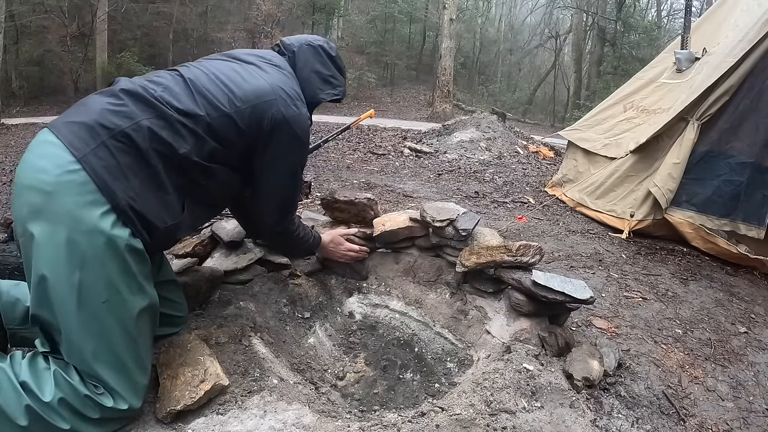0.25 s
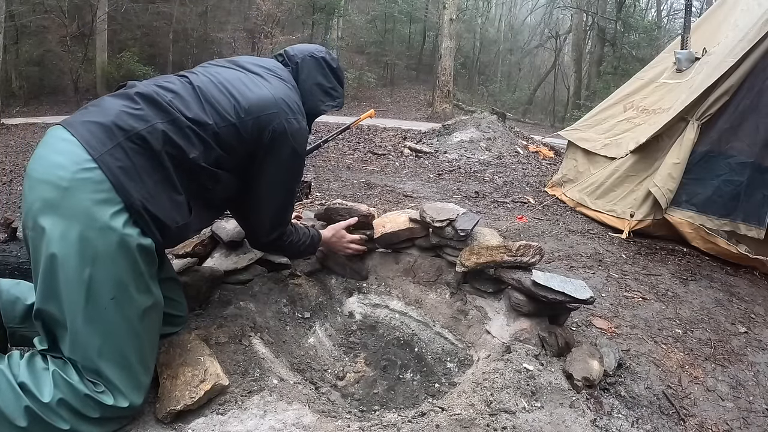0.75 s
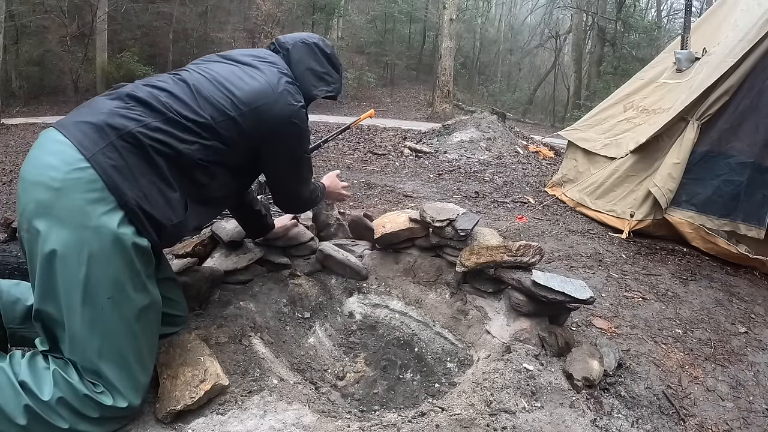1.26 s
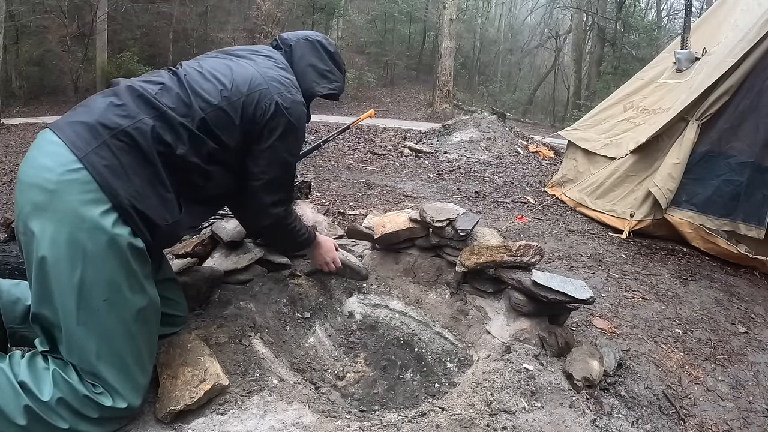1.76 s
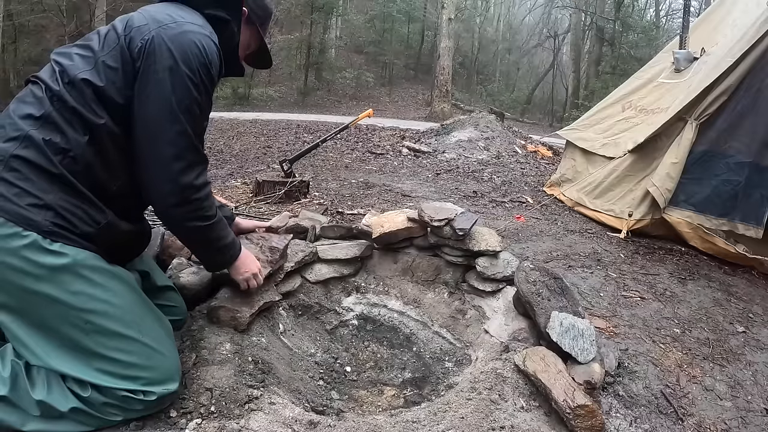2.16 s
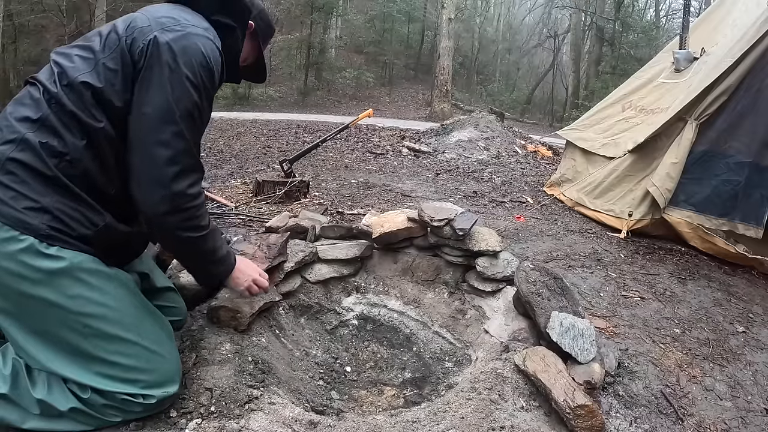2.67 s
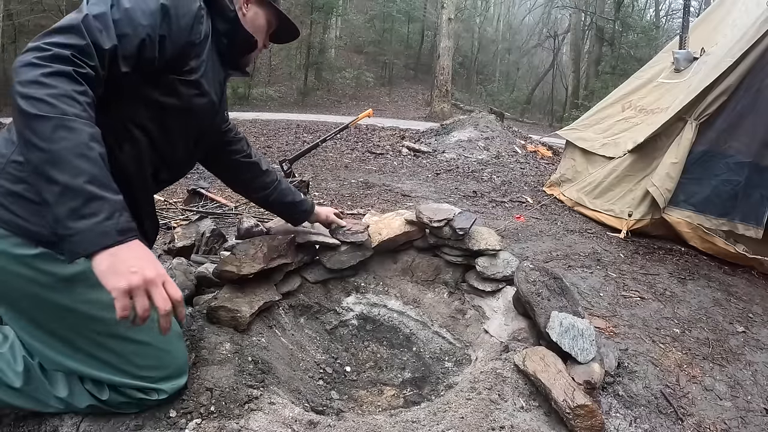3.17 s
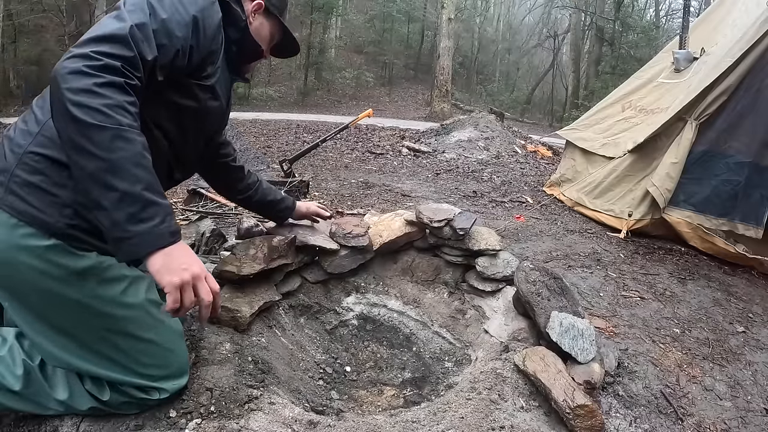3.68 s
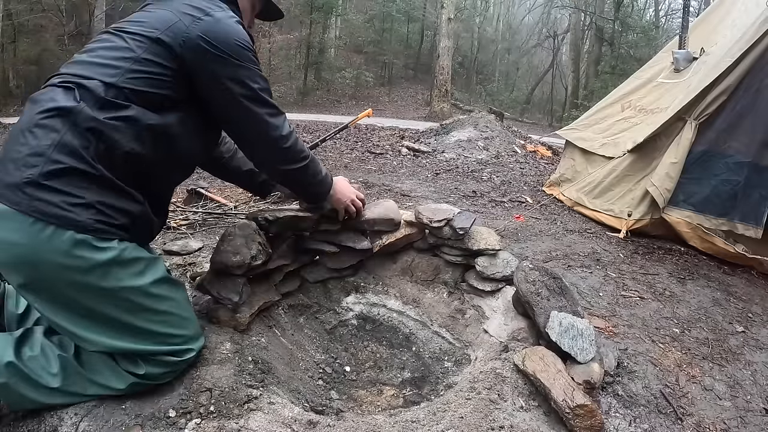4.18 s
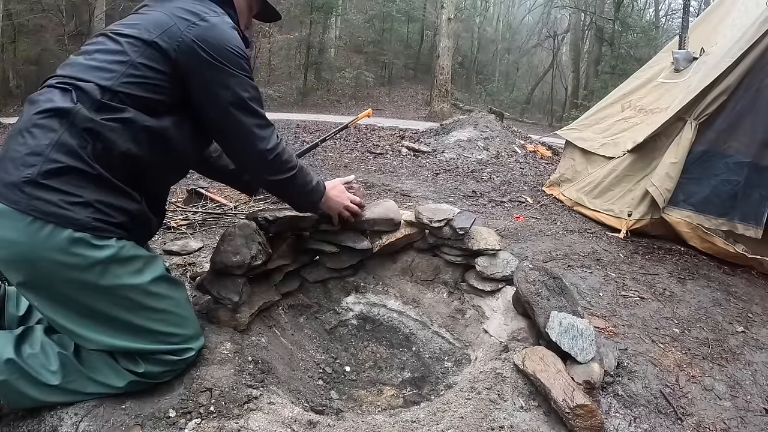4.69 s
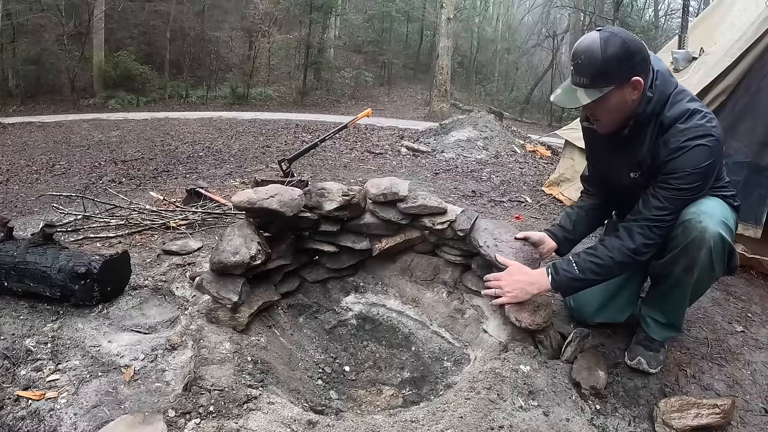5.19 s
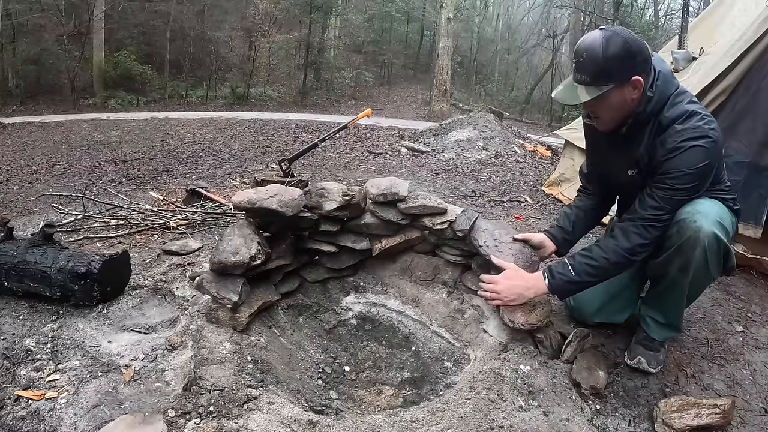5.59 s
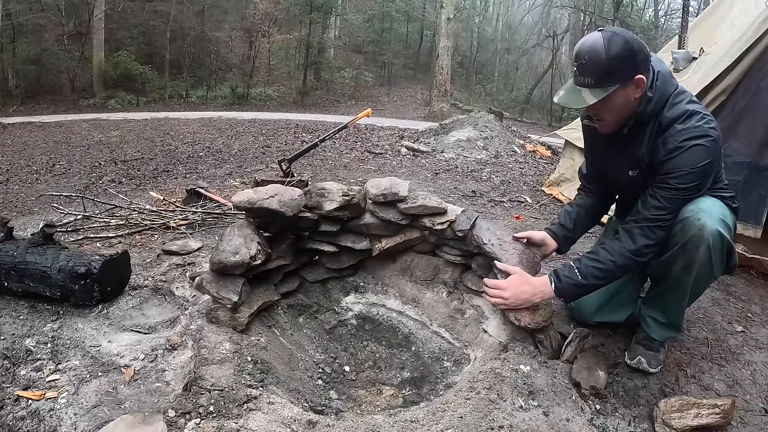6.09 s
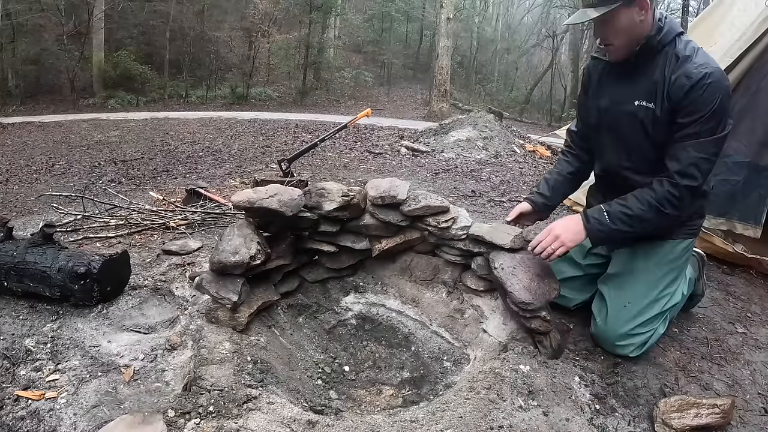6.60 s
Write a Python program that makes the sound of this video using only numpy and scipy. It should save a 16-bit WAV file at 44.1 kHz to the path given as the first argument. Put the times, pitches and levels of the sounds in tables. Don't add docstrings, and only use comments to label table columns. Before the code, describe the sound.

Close, hard stone knocks and gritty dragging come in bursts, then thin out to soft settling ticks over a faint wet woodland hush.

```python
import sys
import numpy as np
from scipy import signal
from scipy.fft import rfft, irfft
from scipy.io import wavfile
from scipy.ndimage import uniform_filter1d

SR = 44100
rng = np.random.default_rng(int(sys.argv[2]) if len(sys.argv) > 2 else 0)


def transcribe(signal):
    frames = np.atleast_2d(signal).T
    limited = np.clip(frames, -1, 1)
    pcm = np.round(limited * 32767).astype(np.int16)
    wavfile.write(sys.argv[1], SR, pcm)


def volts_from_decibels(level):
    exponent = np.asarray(level, float) / 20
    return 10 ** exponent


N = 302016


def evened(x):
    return x / np.sqrt(np.mean(x ** 2) + 1e-20)


def read(points, hz):
    f, value = np.transpose(points)
    return np.interp(np.log(hz + 1), np.log(f + 1), value)


def coloured(x, points):
    gain = volts_from_decibels(read(points, np.fft.rfftfreq(N, 1 / SR)))
    return evened(irfft(rfft(x) * gain, N))


def band(x, low_hz, high_hz):
    return signal.lfilter(*signal.butter(2, [low_hz, high_hz], "band", fs=SR), x)


def resonated(x, hz, width_hz):
    return evened(signal.lfilter(*signal.iirpeak(hz, hz / width_hz, SR), x))


def add(mix, start_s, sound):
    part = mix[..., round(start_s * SR):][..., :sound.shape[-1]]
    part += sound[..., :part.shape[-1]]


def placed(x, pan_db):
    return np.array([x * volts_from_decibels(pan_db / 2), x * volts_from_decibels(-pan_db / 2)])


def ring(hz, t60_ms, rise_ms, phase, size=5292):
    ms = np.arange(size) * 1000 / SR
    rise = (1 - np.exp(-ms / rise_ms)) ** 2
    return volts_from_decibels(-60 * ms / t60_ms) * rise * np.sin(2 * np.pi * (hz * ms / 1000 + phase))


def grains(per_s, spread_db):
    draw = rng.random((N, 3))
    size = volts_from_decibels(spread_db * np.minimum(-np.log(1 - draw[:, 0]), 4))
    return size * np.sign(draw[:, 1] - .5) * (draw[:, 2] < per_s / SR)


def echoes(length_s, t60_s):
    t = np.arange(round(length_s * SR)) / SR
    arrivals = rng.standard_normal((2, len(t))) * (rng.random((2, len(t))) < .05)
    tail = arrivals * volts_from_decibels(-60 * t / t60_s)
    return tail / np.linalg.norm(tail, axis=1, keepdims=True)


def patchy(x, patchy_db):
    z = signal.stft(x, nperseg=256)[2]
    patches = rng.standard_normal(z.shape)
    patches = uniform_filter1d(uniform_filter1d(patches, size=5, axis=0), size=4, axis=1)
    return evened(signal.istft(z * volts_from_decibels(patchy_db * evened(patches)))[1][:N])


def strokes(rows, rest_db=-100):
    attack_s, release_s, edge_db = 0.024, 0.046, -18.5
    t, out = np.arange(N) / SR, np.full(N, rest_db * 1.)
    for start_s, length_s, first_db, last_db in rows:
        at = [start_s - attack_s, start_s, start_s + length_s, start_s + length_s + release_s]
        levels = [first_db + edge_db, first_db, last_db, last_db + edge_db]
        out = np.maximum(out, np.interp(t, at, levels, -100, -100))
    return out


# pitch_hz, density_db (per Hz)
WASH_SPECTRUM = [(25, -6.5), (110, -15.5), (160, 2.5), (300, -6.5), (500, -4.5), (880, -8), (1000, 0.5),
                 (1500, 2), (2600, -6), (7600, -15), (8200, -24), (10200, -18), (11500, -40.5)]
# pitch_hz, likeness (0 to 1)
WASH_COHERENCE = [(60, 1), (500, 0.5), (4000, 0.62), (11000, 1)]


def wood():
    frames, hz = N // 256 + 5, np.fft.rfftfreq(1024, 1 / SR)
    a, b, c, d, patches = rng.standard_normal((frames, 513, 5)).T
    patches = evened(uniform_filter1d(uniform_filter1d(patches, 12, 0), 14, 1))
    same = np.clip(read(WASH_COHERENCE, hz), -1, 1)[:, None]
    left = a + 1j * b
    right = same * left + np.sqrt(1 - same ** 2) * (c + 1j * d)
    z = np.array([left, right]) * volts_from_decibels(read(WASH_SPECTRUM, hz)[:, None] + 1.85 * patches)
    wash = evened(signal.istft(z, nperseg=1024, noverlap=768)[1][:, :N])
    return volts_from_decibels(-57) * wash * volts_from_decibels(np.array([[.4], [-.4]]))


# start_s, length_s, first_db, last_db, rumble_over_drag_db
DRAGS = [(0, 0.28, -38.5, -39.5, 0.5), (0.327, 0.12, -55.5, -36.5, 2), (0.448, .11, -29.5, -32, -1),
         (0.588, 0.11, -51.5, -57, 6.5), (0.732, 0.26, -39, -31.5, -2.5), (1.03, 0.24, -26.5, -30.5, -9),
         (1.331, 0.15, -41.5, -39.5, 13.5), (1.519, 0.11, -28.5, -39.5, -1),
         (1.613, 0.24, -39.5, -53, -3.5), (2.285, .065, -37.5, -53.5, 13), (2.374, 0.39, -50, -57.5, 4),
         (2.754, 0.19, -46, -59, -13), (2.98, 0.11, -43, -34, 1.5), (3.105, 0.077, -33.5, -42.5, 3.5),
         (3.218, 0.36, -56, -59, 7), (3.625, 0.28, -74, -76.5, 12), (4.044, .04, -49.5, -55, -10),
         (4.116, .12, -36, -46.5, 2.5), (4.858, 0.29, -50.5, -58, -4.5), (5.165, .17, -50, -43, 1),
         (5.349, .08, -57, -66.5, 6), (5.475, .07, -52, -54, -5), (5.58, 1.05, -62, -62, -3)]
# pitch_hz, width_hz, early_slab_db, last_boulder_db
STONE_MODES = [(468, 210, -1.5, -21), (1000, 160, -6, -3), (1394, 200, -4, -10), (2030, 760, -19.5, 4),
               (2760, 190, -12, -5.5), (3400, 210, -9.5, -8.5)]


def dragging():
    t = np.arange(N) / SR
    shared = evened(grains(900, 4.9))
    stone = np.zeros(N)
    for hz, width_hz, slab_db, boulder_db in STONE_MODES:
        slips = shared + 2.0 * evened(grains(250, 3.8))
        level_db = np.where(t < 4.84, slab_db, boulder_db)
        stone += volts_from_decibels(level_db) * resonated(slips, hz, width_hz)
    singing = evened(signal.lfilter(*signal.iirpeak(1560, 30, SR), shared))
    singing += volts_from_decibels(-8.5) * evened(signal.lfilter(*signal.iirpeak(2680, 40, SR), slips))
    stone += volts_from_decibels(-5.5) * singing * (t > .72) * (t < 1.75)
    catches = volts_from_decibels(2.2 * evened(uniform_filter1d(rng.standard_normal(N), size=400)))
    drag_db = strokes([row[:-1] for row in DRAGS])
    return volts_from_decibels(drag_db - 5.0) * evened(catches * stone)


# pitch_hz, density_db (per Hz)
RUMBLE_SPECTRUM = [(20, -27), (45, 3.5), (100, -2), (150, 2), (250, -8), (500, -25.5), (900, -61)]


def ground_rumble():
    rows = [(start_s, length_s, first_db + over_db, last_db + over_db)
            for start_s, length_s, first_db, last_db, over_db in DRAGS]
    lumps = volts_from_decibels(2.5 * evened(uniform_filter1d(rng.standard_normal(N), 700)))
    return volts_from_decibels(strokes(rows, rest_db=-78)) * coloured(lumps * rng.standard_normal(N), RUMBLE_SPECTRUM)


# start_s, length_s, first_db, last_db
SWISHES = [(0, 0.3, -54, -45.5), (.31, 0.11, -53.5, -51.5), (.49, 0.066, -44.5, -42.5),
           (.59, 0.13, -56, -50), (.78, 0.072, -59, -40), (.87, 0.25, -39, -40.5), (1.1, .16, -37, -37),
           (1.325, 0.17, -37.5, -57), (1.52, 0.072, -45.5, -43.5), (1.63, 0.19, -59.5, -55.5),
           (1.97, .13, -66, -48), (2.11, 0.24, -46.5, -52.5), (2.38, 0.45, -65.5, -58.5),
           (2.76, 0.24, -46.5, -51.5), (3.06, 0.13, -40.5, -64.5), (3.2, 0.31, -65.5, -55.5),
           (3.57, 0.021, -52, -56), (3.65, 0.22, -75, -58), (3.89, 0.17, -54.5, -54),
           (4.04, 0.018, -44, -47), (4.08, 0.15, -54, -54.5), (4.28, 0.52, -61, -72.5),
           (4.865, 0.22, -58, -68), (5.13, 0.27, -61, -53.5), (5.48, 0.13, -54.5, -60),
           (5.6, 0.81, -67, -66.5), (6.66, 0.17, -64, -58.5)]
# pitch_hz, density_db (per Hz)
HISS_SPECTRUM = [(500, -30.5), (1000, 2.5), (3000, 1.5), (7500, -1.5), (10000, -7), (11500, -21)]


def grit_and_sleeve():
    hiss_db = strokes(SWISHES)
    grit = np.clip((hiss_db + 47.5) / 8, 0, 1)
    source = grit * evened(grains(3000, 3.8)) + (1 - 0.67 * grit) * rng.standard_normal(N)
    crackle = coloured(source, HISS_SPECTRUM)
    hiss = volts_from_decibels(hiss_db) * placed(patchy(crackle, patchy_db=3.0), 3.5 - 4 * grit)
    hiss += volts_from_decibels(hiss_db - 15) * band(crackle[::-1], 7000, 11000) * np.array([[1], [-1]])
    return hiss


def drips():
    snap = rng.standard_normal(400) * ring(0, 11.4, .1, 0.2)[:400]
    drops = np.array([grains(9, 4), grains(9, 4.5)])
    near = signal.oaconvolve(drops, band(snap, 1800, 10500)[None], axes=1)[:, :N]
    return volts_from_decibels(-58) * (near + 0.61 * near[::-1])


# start_s, level_db (peak), main_hz,
# second_hz, t60_ms
HARD_BLOWS = [(0.049, -3.5, 2000, 1020, 7.4), (0.054, -8, 1280, 2130, 10),
              (0.109, -15, 1020, 1390, 11.7), (0.188, -13.5, 1344, 2110, 9.2),
              (0.433, -6, 1603, 1170, 11.3), (0.443, -10, 1200, 1770, 12), (0.463, -18.5, 920, 1500, 38),
              (1.156, -13.5, 1556, 2200, 50), (1.234, -17.5, 1545, 2700, 73),
              (1.251, -19.5, 1550, 2730, 26), (1.274, -22.5, 2810, 1330, 30),
              (1.345, -15.5, 1290, 1130, 14.4), (1.426, -7.5, 960, 1370, 18),
              (1.449, -16, 1260, 2920, 7.8), (1.465, -8, 930, 870, 7.7), (1.521, -11.5, 990, 1560, 10.6),
              (1.539, -14, 604, 900, 9.1), (1.562, -11, 1074, 1490, 17), (1.587, -13.5, 1545, 2000, 80),
              (2.26, -8.5, 1350, 830, 10.5), (2.275, -14, 1000, 1100, 10), (2.282, -16, 720, 1230, 7.3),
                 (2.315, -18.5, 737, 1280, 14), (2.982, -11, 690, 4130, 5.8),
                 (2.999, -11, 1690, 1070, 15.4), (3.043, -14, 1775, 1100, 20),
                 (3.057, -11, 1480, 2370, 8.8), (3.099, -21.5, 1050, 2030, 9.3),
                 (4.107, -8.5, 990, 2560, 11.5), (4.116, -16.5, 1200, 1700, 18),
                 (4.121, -10, 1490, 930, 11.6), (4.185, -25.5, 980, 650, 30), (5.3, -24, 1150, 2206, 25),
                 (5.31, -28.5, 2030, 1480, 27)]
# start_s, level_db (peak), main_hz
TOUCHES = [(0.092, -21, 950), (0.2, -24, 596), (0.522, -26, 1000), (0.742, -32, 1620), (0.828, -29.5, 1540),
           (2.474, -35, 880), (2.571, -37.5, 700), (3.123, -31, 1470), (3.238, -38.5, 2340),
           (3.295, -44, 2220), (4.051, -34, 2840), (4.172, -35, 2650), (5.17, -35, 2030),
           (5.202, -34, 2660), (5.271, -36, 1420), (5.389, -37, 1990), (5.506, -34, 1940),
           (5.659, -41, 1200)]


def clacks():
    out = np.zeros(N)
    touches = [(start_s, db, hz, hz * 1.55, 16.4) for start_s, db, hz in TOUCHES]
    blows = [*HARD_BLOWS, *touches]
    for (start_s, db, main_hz, second_hz, t60_ms), u in zip(blows, rng.random((len(blows), 4))):
        low_hz, high_hz = sorted([main_hz, second_hz])
        high_db = -5.5 * np.sign(second_hz - main_hz) * max(1, t60_ms / 25)
        rise_ms = np.clip(0.062 * t60_ms, .4, 1.6)
        low = ring(low_hz, t60_ms, rise_ms, 0)
        low += .5 * ring(low_hz * (0.58 + 0.209 * u[0]), 0.62 * t60_ms, rise_ms, u[1])
        high = ring(high_hz, t60_ms, rise_ms, 0)
        high += .5 * ring(high_hz * (1.0 + 0.27 * u[2]), 0.49 * t60_ms, rise_ms, u[3])
        modes = low * volts_from_decibels(min(-high_db, 0)) + high * volts_from_decibels(min(high_db, 0))
        rough = rng.standard_normal((2, len(low)))
        crunch = evened(band(band(rough[0], 440, 2210), 350, 7800)) * ring(0, 19.6, 0.72, .25)
        rattle = evened(band(rough[1] ** 3, 377, 1457)) * ring(0, 109, 1.35, 0.28)
        crack = evened(band(rough[1], 2600, 9100)) * ring(0, 9.5, .2, .25)
        clack = modes / abs(modes).max()
        clack += volts_from_decibels(-31.5) * crack + volts_from_decibels(-10.0) * crunch + volts_from_decibels(-20.5) * rattle
        add(out, start_s, volts_from_decibels(db + 1.0) * clack)
    return out


# start_s, level_db (peak),
# pitch_hz, t60_ms
SMALL_PINGS = [(0.05, -20, 3000, 9), (0.202, -32, 3400, 12), (0.055, -12, 2150, 9), (0.323, -36, 1500, 14),
               (0.378, -34, 3450, 25), (0.413, -36, 2500, 6), (0.421, -34, 1500, 12), (0.455, -30, 3700, 15),
               (0.51, -32, 2750, 15), (0.524, -29, 3600, 20), (0.538, -32, 3650, 18), (0.545, -27, 1500, 25),
               (0.545, -31, 2650, 25), (0.556, -33, 3700, 12), (0.737, -29, 1600, 45),
               (0.771, -34, 2650, 25), (0.893, -29, 3610, 30), (0.935, -28, 1420, 15),
               (0.992, -29, 1520, 25), (0.993, -32, 3300, 18), (1.025, -28, 600, 15), (1.035, -26, 964, 15),
               (1.05, -26, 1570, 50), (1.07, -24, 982, 14), (1.095, -26, 1560, 50), (1.113, -29, 3350, 35),
               (1.126, -28, 4400, 20), (1.157, -6, 1530, 12), (1.186, -22, 1100, 15), (1.325, -24, 1410, 20),
               (1.328, -27, 3410, 15), (1.345, -32, 5800, 20), (1.372, -29, 1200, 20),
               (1.406, -32, 2910, 12), (1.421, -33, 4900, 15), (1.422, -14, 1050, 10),
               (1.427, -26, 3300, 10), (1.482, -33, 2850, 25), (1.476, -23, 800, 12), (1.489, -24, 780, 14),
               (1.524, -27, 2740, 12), (1.525, -29, 3900, 12), (1.563, -24, 1550, 70),
               (1.602, -30, 2630, 110), (1.657, -34, 1560, 40), (1.736, -40, 1600, 25),
               (2.257, -24, 1000, 8), (2.261, -22, 2650, 10), (2.277, -28, 3400, 14),
                  (2.492, -33, 600, 20), (2.472, -34, 600, 10), (2.555, -45, 3400, 40),
                  (2.567, -36, 600, 12), (2.58, -44, 3400, 60), (2.676, -40, 1300, 8),
                  (2.677, -38, 500, 20), (2.993, -28, 3300, 8), (3.019, -27, 900, 12),
                  (3.081, -32, 4100, 12), (3.091, -33, 4000, 12), (3.139, -37, 3130, 20),
                  (3.141, -30, 1800, 15), (3.165, -39, 2230, 10), (3.168, -30, 420, 20),
                  (4.017, -38, 2900, 5), (4.026, -35, 3000, 5), (4.033, -38, 2900, 5),
                  (4.069, -39, 3100, 5), (4.097, -30, 900, 12), (4.108, -20, 3400, 9),
                  (4.13, -32, 3600, 12), (4.159, -33, 3150, 14), (5.162, -40, 2000, 15),
                  (5.19, -35, 2170, 15), (5.203, -35, 3300, 15), (5.212, -40, 1800, 12),
                  (5.25, -39, 1850, 25), (5.272, -37, 2430, 15), (5.327, -39, 2200, 15),
                  (5.365, -42, 2030, 12), (5.377, -38, 2060, 15), (5.472, -39, 2260, 15),
                  (5.48, -41, 2200, 15), (5.543, -41, 2240, 15), (5.578, -45, 3350, 20),
                  (5.659, -42, 600, 10)]


def pings():
    out = np.zeros(N)
    pair = 1.12
    for start_s, db, hz, t60_ms in SMALL_PINGS:
        contact = rng.standard_normal(500) * ring(0, 7, .2, .25, size=500)
        contact[0] = 6
        near = ring(hz * pair, 9, .1, .3) + ring(hz / pair, 7, .1, .6)
        ping = signal.oaconvolve(ring(hz, t60_ms, .1, 0) + .4 * near, contact)
        add(out, start_s, volts_from_decibels(db - 4) * ping / abs(ping).max())
    return placed(out, -1.5)


# start_s, level_db (peak), pitch_hz, t60_ms
THUDS = [(0.055, -18.5, 182, 41), (0.111, -21, 135, 46), (0.203, -19.5, 160.7, 63), (0.227, -21.5, 79, 78),
         (0.462, -21, 137, 55), (0.54, -30, 82, 120), (0.95, -24.5, 119, 45), (1.159, -13.5, 179, 46),
         (1.232, -25, 145, 180), (1.345, -22.5, 101, 94), (2.275, -8, 156, 52), (2.492, -32, 104.5, 48),
         (2.678, -37, 100, 56), (2.994, -13, 188, 37), (3.058, -10.5, 152, 31), (3.099, -11, 191.4, 35),
         (3.14, -19.5, 147, 30), (4.129, -23, 155, 100), (5.306, -30, 92, 60), (5.321, -33, 75, 100),
         (5.366, -37, 70, 100), (5.415, -39, 75, 200), (1.426, -20, 130, 80), (1.521, -20, 170, 40),
         (1.75, -40, 200, 150), (2.0, -55, 50, 200), (3.295, -42, 70, 120), (6.55, -52, 152, 350)]
# start_s, level_db (peak), pitch_hz
KNOCKS = [(0.436, -19, 385), (0.737, -27.5, 423), (0.771, -27.5, 370), (0.807, -28, 404), (0.862, -21, 495),
          (1.069, -23.5, 444), (1.123, -24, 328), (1.464, -14, 415), (2.317, -22.5, 307),
          (2.494, -32.5, 450), (2.572, -31.5, 365), (3.125, -25, 377), (3.294, -37, 430), (4.106, -18, 375),
          (4.185, -20.5, 364)]


def thuds():
    out = np.zeros(N)
    knocks = [(*row, 21) for row in KNOCKS]
    for start_s, db, hz, t60_ms in [*THUDS, *knocks]:
        push = ring(hz, t60_ms, 1.57, 0, size=9000)
        push += 0.86 * ring(2.365 * hz, min(0.49 * t60_ms, 40), 1.0, 0, size=9000)
        add(out, start_s, volts_from_decibels(db + 1.5) * push / abs(push).max())
    return out


# start_s, length_ms, level_db (peak),
# pitch_hz
SQUEAKS = [
    (.45, 35, -39, 3720),
    (.462, 14.4, -18.5, 565),
    (1.111, 35, -19.5, 1554),
    (1.157, 13.2, -9, 1150),
    (3.178, 28, -46, 3420),
    (2.316, 38, -39, 3370),
    (2.322, 27, -40.5, 1750),
    (4.994, 45, -47, 3400),
    (5.46, 48, -44, 2230),
    (5.53, 19, -46, 2270),
]


def squeaks():
    out = np.zeros(N)
    for start_s, length_ms, db, hz in SQUEAKS:
        size = round(length_ms * SR / 1000)
        mode = signal.lfilter(*signal.iirpeak(hz, 32, SR), rng.standard_normal(3000))
        tone = evened(mode[-size:])
        add(out, start_s, volts_from_decibels(db - 4.5) * tone * signal.windows.tukey(size, .6))
    return out


# start_s, level_db (peak), pitch_hz, left_over_right_db
TICKS = [(0.478, -27, 4300, 3), (0.863, -21, 4770, -1), (0.893, -29.5, 3860, 1.5),
         (1.047, -29.5, 7300, 2.5), (1.332, -27.5, 3780, -3.5), (1.384, -37, 4900.0, 6),
         (2.472, -44.5, 7800, 3.5), (2.981, -23, 3960, 1), (3.239, -51.5, 4700.0, 4),
         (3.446, -49, 8000.0, -2), (3.571, -35.5, 5240, 4), (3.586, -37, 7000, 8), (3.594, -40.5, 4500, 5),
         (4.051, -37, 4030, 8), (4.17, -31.5, 8600, -2.5), (4.204, -37, 3620, -4), (4.865, -49.5, 5430, -2),
         (5.303, -34.5, 5230, -2.0), (5.506, -41.5, 7330, 7), (5.659, -48, 3500, 4), (5.72, -52, 6300, 7),
         (5.841, -46.5, 4450, 8), ]


def ticks():
    out = np.zeros((2, N))
    for start_s, db, hz, pan_db in TICKS:
        burst = rng.standard_normal(600) * ring(0, 20.8, 0.18, .25)[:600]
        tick = evened(band(burst, 2670, 6840)) + 0.62 * evened(band(burst, 0.81 * hz, 1.12 * hz))
        add(out, start_s, placed(volts_from_decibels(db + 7.5) * tick / abs(tick).max(), pan_db))
    return out


# start_s, length_ms, level_db (peak), pitch_hz
BIRDS = [
    (.706, 27, -52, 7230),
    (2.483, 39, -56, 7220),
    (3.298, 26, -56, 7470),
    (4.737, 20.2, -39, 7120),
    (6.044, 13, -57, 7150),
    (6.1, 14, -57, 7370),
    (6.301, 5.8, -52, 6800),
    (6.359, 10, -51, 6860),
]


def birds():
    out = np.zeros(N)
    for start_s, length_ms, db, held_hz in BIRDS:
        first, last = (.85, 1.025) if length_ms > 20 else (1.07, 1.12)
        u = np.linspace(0, 1, round(length_ms * SR / 1000))
        hz = np.interp(u, [0, .3, 1], [first, 1, last]) * held_hz
        hz = uniform_filter1d(hz, 100, mode="nearest")
        chip = np.sin(np.pi * u) ** 0.47 * np.sin(2 * np.pi * np.cumsum(hz) / SR)
        add(out, start_s, volts_from_decibels(db) * chip)
    trees = signal.oaconvolve(out[None], echoes(0.23, 0.29), axes=1)[:, :N]
    return placed(out, 13.4) + volts_from_decibels(-2.0) * trees


def scene():
    hits = clacks() + squeaks()
    pile = volts_from_decibels(-17.0) * signal.oaconvolve(hits[None], echoes(0.073, 0.11), axes=1)[:, :N]
    stones = placed(hits, -1.95) + pile + pings()
    ground = placed(dragging() + ground_rumble() + thuds(), -0.86)
    return wood() + ground + grit_and_sleeve() + drips() + stones + ticks() + birds()


def top_gate(x, gate_db):
    hz, _, z = signal.stft(x, SR, nperseg=1024)
    power = uniform_filter1d((abs(z) ** 2).mean(0), size=9, axis=0)
    power = uniform_filter1d(power, size=3, axis=1)
    around = power[(hz > 4000) & (hz < 12000)].mean(0)
    around = around * volts_from_decibels(5 * uniform_filter1d(rng.standard_normal(len(around)), size=5))
    keep = (power > around * volts_from_decibels(2 * gate_db)) | (hz < 8000)[:, None]
    return signal.istft(z * keep, nperseg=1024)[1][:, :N]


def roll_off(x):
    return signal.sosfilt(signal.butter(12, 11900, fs=SR, output="sos"), x)


def record(dry):
    limited = signal.oaconvolve(dry, signal.firwin(255, 11600, fs=SR)[None], "same")
    return roll_off(top_gate(limited, gate_db=-13.5))


dry = scene()
out = record(dry)
transcribe(out)
```